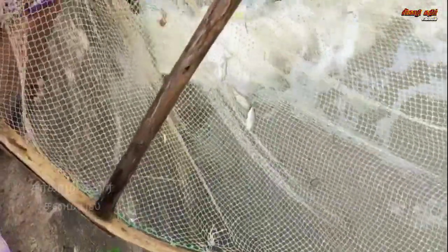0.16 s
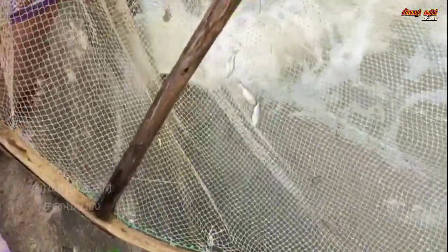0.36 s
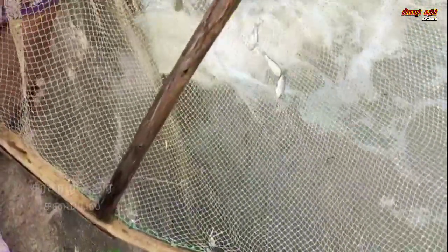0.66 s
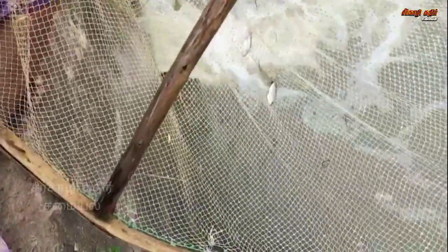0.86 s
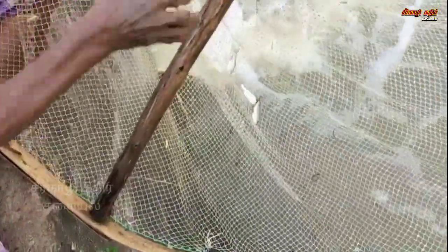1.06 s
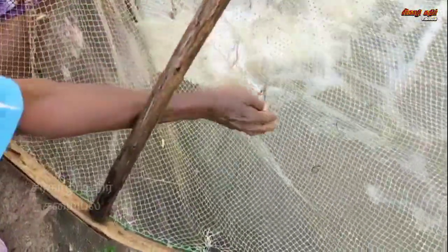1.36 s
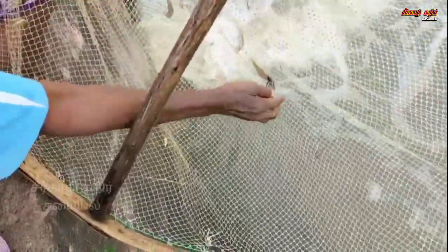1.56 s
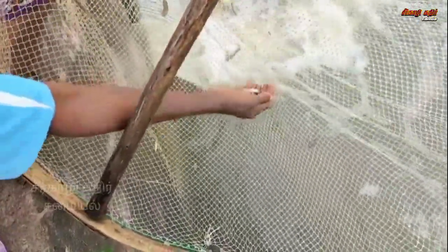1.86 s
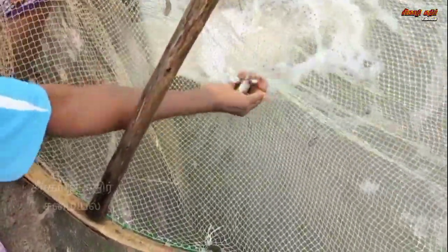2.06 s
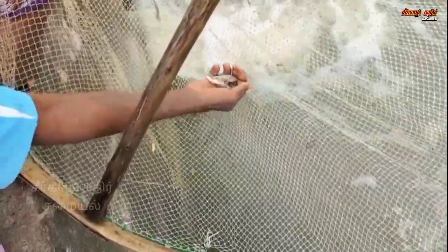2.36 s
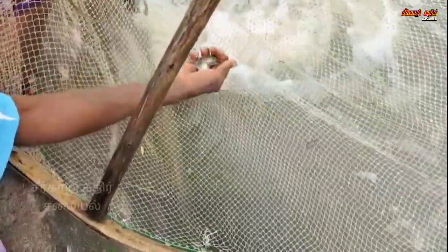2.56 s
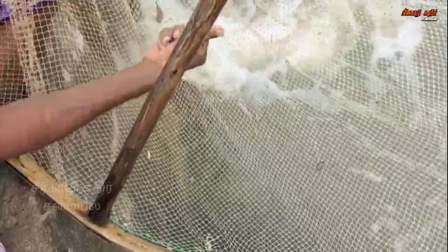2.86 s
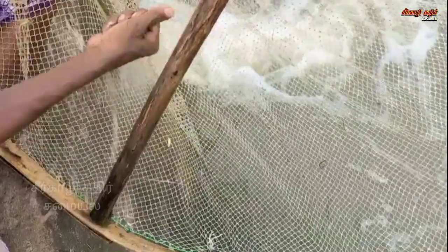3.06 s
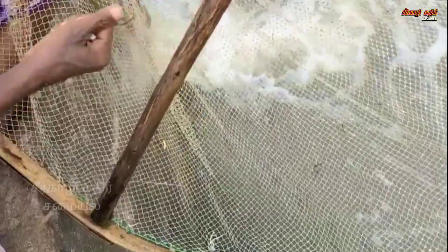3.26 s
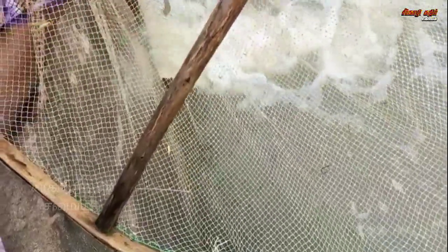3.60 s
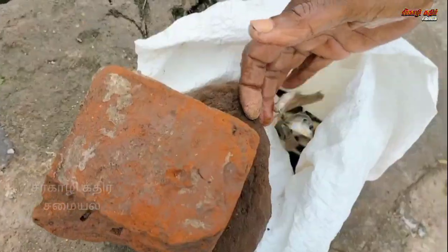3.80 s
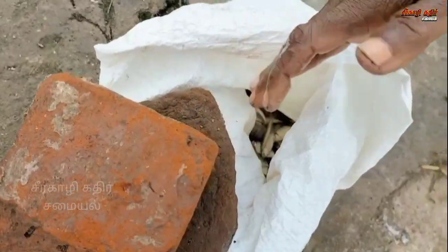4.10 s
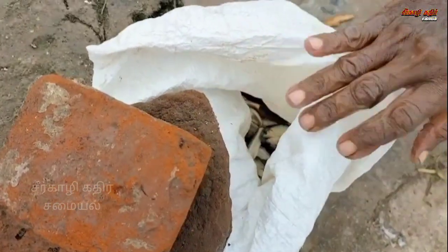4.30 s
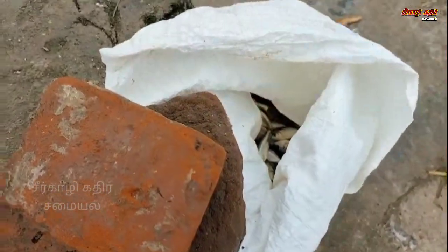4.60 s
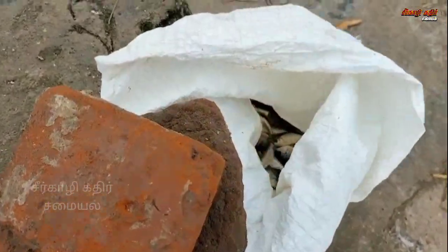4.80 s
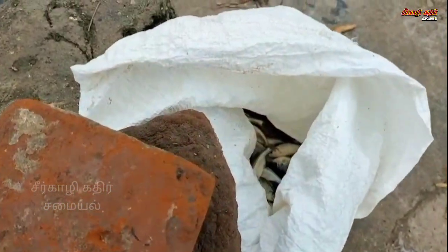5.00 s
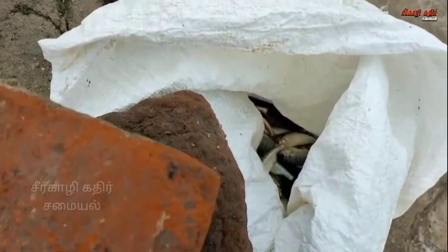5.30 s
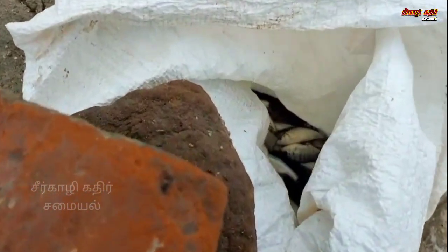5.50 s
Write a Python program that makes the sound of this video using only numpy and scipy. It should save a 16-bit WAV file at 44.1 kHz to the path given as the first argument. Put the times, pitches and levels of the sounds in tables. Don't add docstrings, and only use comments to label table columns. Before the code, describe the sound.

Steady foaming rush of water close by, a brief dead silence, then a quieter, shifting wash with heavy wind thumps on the microphone.

```python
import sys
import numpy as np
from scipy import signal
from scipy.io import wavfile
from scipy.ndimage import uniform_filter1d, map_coordinates

SR = 44100
rng = np.random.default_rng(int(sys.argv[2]) if len(sys.argv) > 2 else 0)


def volts_from_decibels(level):
    exponent = np.asarray(level, float) / 20
    return 10 ** exponent


def put_to_file(sound):
    columns = np.atleast_2d(sound).T
    safe = np.clip(columns, -1, 1)
    whole_steps = np.round(safe * 32767)
    wavfile.write(sys.argv[1], SR, whole_steps.astype(np.int16))


N = 249165

SILENCE = 3.5163, 4.1346
CONTROL_STEP = 32


def evened(x):
    return x / np.sqrt(np.mean(x ** 2) + 1e-20)


def steadied(x, size=700):
    return x / np.sqrt(uniform_filter1d(x ** 2, size=size) + 0.24 * np.mean(x ** 2))


def read(points, hz):
    f, value = np.transpose(points)
    return np.interp(np.log(hz + 1), np.log(f + 1), value)


def follow(tables, t):
    s, *columns = np.concatenate(tables).T
    return [np.interp(t, s, column) for column in columns]


def swells(rows, t, rise, fall):
    s, hold, db = np.transpose(rows)[:3, :, None]
    return db - rise * np.maximum(s - t, 0) - fall * np.maximum(t - s - hold, 0)


def slowly(db):
    return volts_from_decibels(np.interp(np.arange(N), np.arange(len(db)) * CONTROL_STEP, db))


def add(mix, s, sound):
    part = mix[max(round(s * SR), 0):][:len(sound)]
    part += sound[:len(part)]


def band(x, low_hz, high_hz, order=2):
    return signal.sosfilt(signal.butter(order, [low_hz, high_hz], "band", fs=SR, output="sos"), x)


def resonate(x, hz, width):
    turn = np.exp(2j * np.pi * np.cumsum(hz) / SR)
    pole = np.exp(-np.pi * width / SR)
    smooth = signal.lfilter([1 - pole], [1, -pole], x / turn + 1e-18)
    return 2 * (turn * smooth).real


def bubble(hz, length_ms, rise=0.067):
    u = np.arange(-2, 3, 1000 / (SR * length_ms))
    shape = np.exp(-np.where(u < 0, 3.0, 1.2) * u ** 2)
    return shape * np.sin(2 * np.pi * np.cumsum(hz * (1 + rise * u)) / SR)


def churn(per_s=3000, spread_db=1.5, grain_share=0.17):
    kinds = np.geomspace(150, 15000, 36)
    which = rng.integers(0, len(kinds), N)
    size = volts_from_decibels(spread_db * np.minimum(rng.exponential(1, N), 4)) * (rng.random(N) < per_s / SR)
    grains = np.zeros(N)
    for k, hz in enumerate(kinds):
        cycles = 1.41 + 0.0011 * hz
        grain = bubble(hz, 1000 * cycles / hz)
        grain = grain / np.linalg.norm(grain) * np.sqrt(hz)
        grains += signal.oaconvolve(size * (which == k), grain)[:N]
    smooth = rng.standard_normal(N)
    return np.sqrt(grain_share) * evened(grains) + np.sqrt(1 - grain_share) * smooth


def blotches(shape, bins, frames):
    chance = uniform_filter1d(rng.standard_normal(shape), size=bins, axis=0)
    return evened(uniform_filter1d(chance, size=frames, axis=1))


def water(patchy_db=-0.5, flicker_db=0.72, gurgle_db=1.5):
    # f/Hz, level/dB per Hz
    near = [(18, -51), (30, -24), (133, -1), (315, -2), (467, 1.5), (691, 0), (1110, 8.5), (1770, -3),
            (2070, -8.5), (3880, -11), (4540, -20), (5740, -18.5), (7260, -22.5), (9190, -47.5),
            (15500, -48)]
    # f/Hz, level/dB per Hz
    away = [(18, -37), (30, -13), (102, -2), (230, 20), (299, -19), (443, 12), (673, -4.5), (921, -19),
            (1770, -36.5), (2180, -20.5), (3880, -19.5), (4660, -41), (7080, -27.5), (9190, -47),
            (15500, -46)]
    # f/Hz, width/Hz, lift/dB
    humps = [(192, 44, -4.5), (1180, 630, -7.5), (4025, 350, 3), (5726, 150, 1.5), (6600, 720, -4),
             (9200, 500, -5), (11900, 550, 7), (13200, 1600, -4), (15700, 700, 9.5)]
    # t/s, level/dB
    flow = [(0.0, -32.5), (0.6, -31), (1.4, -32), (2.3, -32), (3.52, -32), (4.13, -31), (4.25, -32),
            (4.4, -35), (4.5, -39.5), (4.66, -37), (4.86, -39), (4.92, -40), (5.65, -41)]
    # t/s, share 0-1
    turning = [
        (4.14, 0.11),
        (4.35, 0.15),
        (4.8, 0.2),
        (5.0, 0.07),
    ]
    # t/s, hold/s, lift/dB
    slugs = [
        (0.18, .01, 2),
        (0.49, 0.0088, -3),
        (0.63, .01, -1),
        (1.29, 0.0063, 2),
        (1.34, 0.0097, 2),
        (2.31, 0.0052, 1),
        (3.07, 0.0089, 2),
        (4.515, 0.0087, 3),
        (4.562, .01, 0),
        (4.59, 0.0073, -0.5),
    ]
    slug_db_per_s = 197.5
    hz, t, z = signal.stft(churn(), SR, nperseg=1024, noverlap=768)
    slug_db = np.maximum(swells(slugs, t, slug_db_per_s, slug_db_per_s).max(0), 0)
    level_db = follow([flow], t)[0] + slug_db
    spray_db = np.where(t > SILENCE[0], -6.5, -7) - slug_db
    turn = follow([turning], t)[0] * (t > SILENCE[0])
    colour = np.outer(read(near, hz), 1 - turn) + np.outer(read(away, hz), turn)
    for f, width, db in humps:
        colour += (db / (1 + (2 * (hz - f) / width) ** 2))[:, None]

    body = (hz > 500) & (hz < 3000)
    spray = (hz > 3000) & (hz < 8000)
    body_db, top_db = (10 * np.log10((volts_from_decibels(colour[b]) ** 2).sum(0) / len(hz)) for b in (body, spray))
    high = np.clip(np.log2(hz / 2000 + 1e-9), 0, 1)[:, None]
    colour += level_db - body_db + high * (spray_db + body_db - top_db)

    colour += patchy_db * blotches(z.shape, bins=14, frames=8)
    colour += flicker_db * blotches(z.shape, bins=150, frames=3)
    colour += gurgle_db * blotches(z.shape, bins=3, frames=6)
    return signal.istft(z * volts_from_decibels(colour), SR, nperseg=1024, noverlap=768)[1][:N]


def mirrored(x):
    # start t/s, end t/s, first delay/ms, last delay/ms, share
    mirrors = [(4.36, 4.6, 2.74, 2.68, .38), (4.38, 4.55, 2.49, 2.51, -.25), (4.34, 4.55, 1.17, 1.16, .22),
               (4.34, 4.66, 1.94, 2.07, .22), (4.54, 4.74, 4.18, 4.04, .32), (4.58, 4.86, 3.45, 3.2, .3),
               (4.65, 4.92, 1.11, 1.15, .32), (4.62, 4.86, 1.46, 1.45, -.22), (4.5, 4.62, 4.58, 4.57, .18),
               (4.46, 4.54, 5.57, 5.57, -.22), (4.66, 5.25, .95, .91, -.2), (4.9, 5.14, 1.0, 1.0, .2)]
    t = np.arange(N) / SR
    out, power = x.copy(), np.ones(N)
    dull = band(x, 20, 5500)
    for start, end, first_ms, last_ms, share in mirrors:
        u = np.clip((t - start) / (end - start), 0, 1)
        gain = share * np.sqrt(np.sin(np.pi * u))
        late = (t - (first_ms + (last_ms - first_ms) * u) / 1000) * SR
        out += gain * map_coordinates(dull if first_ms < 1.2 else x, [late], order=3)
        power += gain ** 2
    return out / np.sqrt(power)


def splashes(tick_db=-8.0, spray_hz=5000, spray_width=350):
    # t/s, f/Hz, peak level/dB, length/ms
    large = [(0.14, 1560, -22, 1.7), (0.154, 1143, -20, 2.6), (0.206, 1100, -11.5, 2.8),
             (0.292, 796, -23.5, 2.7), (0.312, 1130, -26, 2.4), (0.353, 1420, -24, 5.6),
             (0.4935, 990, -15.5, 1.17), (0.655, 840, -24, 2.0), (1.119, 301, -24, 5.2),
             (1.119, 1280, -24.5, 4.9), (1.377, 1137, -18, 2.7), (1.537, 463, -21, 5.0),
             (1.548, 1796, -29, 20), (1.597, 1248, -26.5, 4.6), (1.648, 450, -23, 4.0),
             (1.662, 1730, -19.5, 2.7), (1.984, 1840, -25.5, 3.5), (2.064, 442, -21.5, 3.4),
             (2.084, 732, -27, 7.3), (2.177, 1740, -19.5, 1.8), (2.305, 840, -23.5, 9.9),
             (2.395, 1414, -27.5, 4.9), (3.082, 1500, -27, 3.2), (3.299, 2275, -29, 6.3),
             (4.869, 1770, -25.5, 3.5)]
    # t/s, f/Hz, peak level/dB
    small = [(0.144, 3550, -23.5), (0.282, 3510, -29), (0.504, 5440, -31), (0.504, 6869, -41),
             (0.506, 6250, -38), (0.527, 3930, -26), (0.578, 5650, -39), (0.737, 5540, -31),
             (0.974, 7100, -35), (1.118, 3990, -30), (1.207, 6260, -38), (1.289, 3820, -25.5),
             (2.344, 5320, -37), (4.282, 3640, -27), (4.424, 6600, -41), (4.554, 7192, -38),
             (4.566, 7600, -39), (4.582, 7192, -41), (4.599, 6395, -41), (4.698, 3680, -29)]
    small_ms = 2.1
    # t/s, peak level/dB, centre f/Hz
    ticks = [(0.022, -53, 12400), (0.0957, -52, 11500), (0.402, -52, 11500), (0.4643, -55, 11500),
             (0.5045, -38, 9700), (0.7342, -50, 11000), (0.9258, -58, 11500), (0.9692, -59, 11500),
             (1.728, -53, 12000), (2.5815, -58, 11500), (2.5995, -51, 11500), (2.7287, -55, 12000),
             (2.909, -56.5, 13400), (3.384, -52, 10300), (4.186, -49, 12000), (4.565, -60, 10500),
             (4.600, -55, 12400)]
    # delay/ms, level/dB
    banks = [
        (4.4, -9),
        (10.5, -13),
        (17, -17),
    ]
    out = np.zeros(N)
    for s, hz, db, length_ms in large + [(*row, small_ms) for row in small]:
        sound = bubble(hz, length_ms, rise=0.021)
        if hz > spray_hz:
            sound = bubble(hz, 0.79 * length_ms, rise=0)
            fuzz = evened(band(rng.standard_normal(6000), 20, spray_width, order=3))
            sound = .2 * evened(sound * np.resize(fuzz, len(sound)))
        add(out, s - len(sound) * .4 / SR, volts_from_decibels(db) * sound)
    walls = np.zeros(2000)
    walls[0] = 1
    for delay_ms, db in banks:
        walls[round(delay_ms * SR / 1000)] = -volts_from_decibels(db)
    out = signal.oaconvolve(out, walls)[:N]
    decay = np.exp(-np.arange(300) / 90)
    for s, db, hz in ticks:
        puff = band(rng.standard_normal(300), .85 * hz, 0.99 * hz, order=1)
        add(out, s, volts_from_decibels(db + tick_db) * evened(puff) * decay)
    return out


def glugs():
    # t/s, f/Hz, peak level/dB, length/ms
    rings = [(0.010, 271, -26, 7.5), (0.214, 3580, -33, 3), (0.258, 512, -22.5, 3), (0.738, 279, -35, 8),
             (0.811, 135, -21.5, 5.6), (0.828, 1400, -26, 2.6), (0.909, 1040, -19, 2),
             (1.027, 147, -27.5, 7), (1.251, 1200, -27, 12), (1.280, 1085, -26, 3.3),
             (1.358, 130, -32, 13.7), (1.358, 1137, -25, 4), (2.393, 1875, -29, 3.2),
             (3.170, 127, -30.5, 10), (3.483, 129.7, -33.5, 10.2), (4.174, 940, -24.5, 2.35),
             (4.196, 1464, -32, 3.6), (4.378, 310, -22, 3.74), (4.567, 270, -27, 3.05),
             (4.592, 837, -32, 4.4), (4.857, 308, -20.5, 4.02), (4.395, 150, -24.5, 10),
             (2.312, 250, -26, 6), (5.37, 450, -23.5, 1.2), (5.422, 227, -18.5, 4.1),
             (5.452, 264, -16.5, 2.6)]
    # t/s, peak level/dB, f/Hz
    slaps = [(0.022, -17, 864), (0.101, -15.5, 1110), (0.204, -15.5, 1075), (0.288, -20.5, 794),
             (0.35, -19, 1070), (0.388, -27, 888), (0.492, -15.5, 1170), (0.62, -18.5, 1070),
             (0.704, -19, 1220), (0.808, -16.5, 1090), (0.89, -20.5, 894), (0.977, -15, 937),
             (1.115, -13, 1310), (1.202, -17.5, 861), (1.374, -18.5, 1147), (1.435, -17.5, 1060),
             (1.596, -19, 1300), (1.66, -20, 1710), (1.874, -20, 1160), (2.052, -22.5, 497),
             (2.175, -20, 1800), (2.303, -17.5, 1150), (2.392, -20, 1150), (2.422, -18, 875),
             (2.701, -21, 1140), (2.813, -23.5, 886), (2.869, -15, 1010), (2.934, -20, 1130),
             (3.054, -19, 1300), (3.227, -19, 1150), (3.266, -21, 1080)]
    slap_cycles, slap_db = 1.3, -4.5
    slap_rings = [(s + .002, hz, db + slap_db, 1000 * slap_cycles / hz) for s, db, hz in slaps]
    out = np.zeros(N)
    for s, hz, db, length_ms in rings + slap_rings:
        sound = bubble(hz, length_ms, rise=0.013)
        add(out, s - len(sound) * .4 / SR, volts_from_decibels(db) * sound)
    return band(out, 85, 12000, order=3)


def air_column(mode_hz, width):
    hz = np.full(N, float(mode_hz))
    return resonate(resonate(rng.standard_normal(N), hz, width), hz, 2 * width)


def culvert():
    # t/s, hold/s, level/dB
    surges = [(0.0, 0.0087, -35), (0.4, 0.054, -46.5), (0.75, 0.035, -34), (0.94, .02, -36.5),
              (1.1, 0.25, -41.5), (1.53, 0.018, -35.5), (1.75, .02, -38), (1.88, 0.13, -38),
              (2.2, 0.1, -40), (2.62, 0.17, -39), (2.95, .12, -45.5), (3.13, 0.042, -35),
              (3.43, 0.032, -35)]
    rise, fall, idle_db = 130, 270, -49
    t = np.arange(0, N, CONTROL_STEP) / SR
    db = np.maximum(swells(surges, t, rise, fall).max(0), idle_db)
    hum = steadied(air_column(253, width=34), size=3000)
    return hum * slowly(db) * (np.arange(N) / SR < SILENCE[0])


def deep():
    return volts_from_decibels(-50) * evened(air_column(143, width=24)) * (np.arange(N) / SR < SILENCE[0])


def wind(width=85, small_db=-5.0):
    # t/s, hold/s, level/dB
    push_table = [(0.0, .01, -39), (0.47, 0.18, -42.5), (0.72, .01, -33.5), (0.81, .01, -38.5),
                  (0.88, 0.4, -51), (1.29, 0.035, -54), (1.6, .01, -50), (1.83, .01, -44), (2.25, .01, -47),
                  (2.4, 0.14, -45), (2.57, 0.033, -35.5), (2.71, .01, -38), (2.85, 0.11, -51),
                  (3.1, 0.059, -34), (3.19, .06, -44), (3.34, .02, -35.5), (3.44, 0.025, -32),
                  (4.136, .06, -35), (4.38, 0.044, -51), (4.56, 0.032, -34.5), (4.65, .1, -43),
                  (4.86, .02, -36), (4.97, .01, -34.5), (5.06, 0.041, -35), (5.24, 0.04, -33.5),
                  (5.3, .04, -37.5), (5.39, 0.11, -34), (5.6, .05, -34)]
    push_rise, push_fall, calm_db = 240, 500, -64.5
    # t/s, hold/s, level/dB, centre f/Hz, small eddies re large/dB
    gust_table = [(0.704, .12, -51.5, 190, -1), (0.892, 0.012, -54, 160, -2), (2.297, 0.04, -35, 229, 7),
                  (2.58, 0.036, -40.5, 185, 0), (3.104, 0.041, -49, 168, -6),
                  (3.305, 0.018, -35.5, 176, -2), (3.41, 0.045, -44, 174.3, 12),
                  (4.128, 0.011, -32.5, 164, -13), (4.227, 0.019, -31.5, 210, 9),
                  (4.271, 0.056, -32.5, 191, -6), (4.376, 0.027, -25, 145, 2),
                  (4.564, 0.052, -20.5, 145, 5), (4.739, 0.017, -34, 173, -5), (4.857, 0.036, -27, 176, 3),
                  (4.961, 0.02, -34, 185, -13), (5.007, 0.14, -38.5, 176, 1), (5.066, 0.0089, -29, 185, -3),
                  (5.184, 0.017, -32, 196, -1), (5.284, 0.032, -47, 140, 14), (5.359, 0.024, -39.5, 162, 9),
                  (5.411, 0.023, -26.5, 164, 3.5), (5.444, 0.017, -27, 169, -4),
                  (5.595, 0.0053, -22, 156, -22), (5.61, .02, -35, 156, -11)]
    gust_rise, gust_fall = 1460, 970
    small_fade = 400
    pitch_sag = .5
    t = np.arange(0, N, CONTROL_STEP) / SR
    push_db = np.maximum(swells(push_table, t, push_rise, push_fall).max(0), calm_db)
    rumble = steadied(band(rng.standard_normal(N), 58, 120, order=1), size=2500) * slowly(push_db)

    gusts = swells(gust_table, t, gust_rise, gust_fall)
    start, _, _, centre_hz, small = np.transpose(gust_table)[:, gusts.argmax(0)]
    age = np.clip(t - start, 0, .15)
    hz = np.interp(np.arange(N) / SR, t, centre_hz * (1 - pitch_sag * age))
    eddies = steadied(resonate(resonate(rng.standard_normal(N), hz, width), hz, 1.7 * width))
    fast = steadied(band(rng.standard_normal(N), 216, 473, order=3))
    eddies += slowly(small + small_db - small_fade * age) * fast
    return band(rumble + band(eddies * slowly(gusts.max(0)), 58, 710), 18, 1800, order=1)


def whistle(curves, blur, octave_db=-60, waver=.002, throb_db=1.6):
    out = np.zeros(N)
    for rows in curves:
        t = np.arange(rows[0][0], rows[-1][0], 1 / SR)
        hz, db = follow([rows], t)
        a, b, c = rng.standard_normal((3, len(t)))
        hz *= 1 + waver * evened(band(a, 18, 70))
        phase = 2 * np.pi * np.cumsum(hz) / SR
        tone = np.sqrt(2) * np.sin(phase)
        tone += blur * evened(resonate(resonate(c, hz, 98), hz, 160))
        tone += volts_from_decibels(octave_db) * np.sin(2 * phase)
        level = volts_from_decibels(db + throb_db * evened(band(b, 9.1, 60)))
        add(out, t[0], level * evened(tone) * signal.windows.tukey(len(t), .05))
    return out


def folds():
    # t/s, f/Hz, level/dB
    fold_curves = [
        [(4.42, 2180, -59), (4.48, 2220, -53), (4.56, 2190, -56)],
        [(4.5, 830, -55), (4.58, 850, -36.5), (4.67, 880, -45)],
        [(4.54, 1380, -55), (4.59, 1420, -48), (4.63, 1600, -44), (4.67, 1640, -58)],
        [(4.56, 1780, -53), (4.66, 1800, -51), (4.79, 1790, -49)],
        [(4.45, 2960, -54), (4.52, 2950, -51), (4.6, 2900, -56), (4.7, 2930, -50)],
        [(4.6, 2600, -56), (4.7, 2700, -49), (4.8, 2740, -55)],
        [(4.78, 3860, -50), (4.83, 3860, -52), (4.95, 3880, -54)],
        [(4.68, 1050, -39), (4.74, 1020, -50), (4.85, 960, -46)],
        [(4.57, 8930, -80), (4.62, 8960, -77), (4.68, 9040, -83), (4.74, 8980, -80)],
        [(4.39, 6640, -64), (4.43, 6660, -61), (4.47, 6640, -67)],
        [(4.44, 5260, -64), (4.48, 5260, -62), (4.55, 5450, -62)],
        [(4.72, 10790, -86), (4.75, 10800, -80), (4.79, 10800, -86)],
    ]
    return volts_from_decibels(0.5) * whistle(fold_curves, blur=0.65)


def birds():
    # t/s, f/Hz, level/dB
    clear = [
        [(.17, 4260, -50), (.2, 4270, -50), (.238, 4335, -39), (.262, 4280, -47), (.296, 4420, -51),
         (.32, 4380, -55)],
        [(4.29, 4170, -55), (4.304, 4250, -39), (4.348, 4280, -44), (4.37, 4200, -52)],
        [(4.43, 4300, -50), (4.446, 4325, -43), (4.52, 4250, -42), (4.565, 4340, -41), (4.6, 4510, -46),
         (4.66, 4550, -52), (4.72, 4500, -49), (4.784, 4240, -45), (4.8, 4200, -62)],
    ]
    # t/s, f/Hz, level/dB
    hoarse = [
        [(4.5, 3660, -58), (4.58, 3740, -50), (4.66, 3800, -52), (4.74, 3900, -53), (4.81, 3840, -52),
         (4.86, 3880, -56)],
        [(4.4, 2524, -48), (4.425, 2550, -45), (4.55, 2570, -58)],
        [(4.44, 3290, -54), (4.48, 3300, -49), (4.56, 3310, -52)],
        [(4.69, 6880, -64), (4.75, 7010, -53), (4.8, 6740, -64)],
        [(4.68, 10100, -84), (4.75, 10080, -78), (4.84, 10050, -84)],
        [(4.76, 5180, -62), (4.8, 5180, -57), (4.85, 5200, -62)],
    ]
    return volts_from_decibels(-1.5) * whistle(clear, blur=.6, octave_db=-34) + whistle(hoarse, blur=1.1)


def scene():
    wash = mirrored(water()) + splashes() + glugs()
    hum = culvert() + deep()
    return (wash + hum + wind() + folds() + birds())[None]


def low_pass(x):
    return signal.sosfilt(signal.butter(12, 16820, fs=SR, output="sos"), x)


def record(dry):
    t = np.arange(N) / SR
    fade = np.clip(np.maximum(SILENCE[0] - t, t - SILENCE[1]) / .0007 + .5, 0, 1)
    hiss = evened(band(rng.standard_normal(N), 11500, 16500, order=1))
    hissed = dry + volts_from_decibels(-77) * hiss
    clipped = .36 * np.tanh(hissed / .36)
    faded = clipped * np.sin(np.pi / 2 * fade) ** 2
    edge = signal.firwin(3001, 15490, window=("kaiser", 10), fs=SR)
    return low_pass(signal.oaconvolve(faded, edge[None], "same"))


dry = scene()
out = record(dry)
put_to_file(out)
```